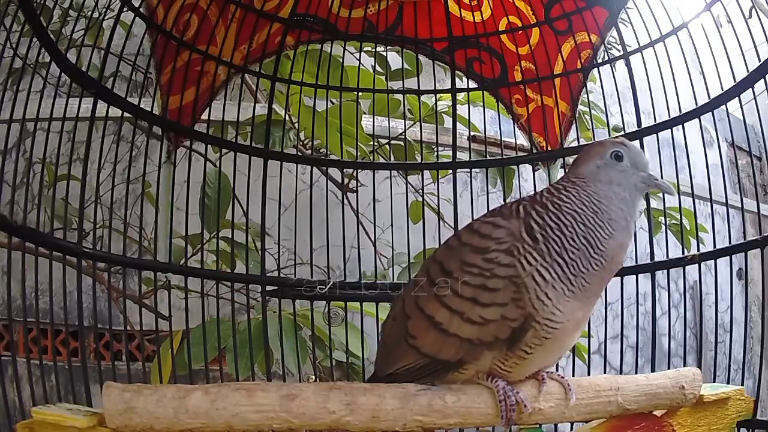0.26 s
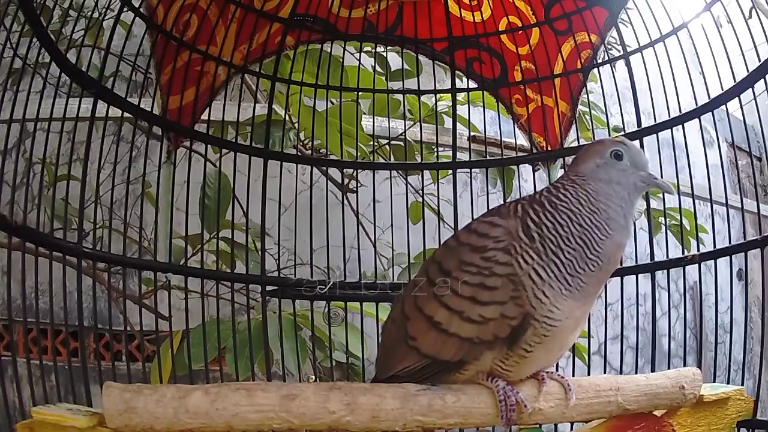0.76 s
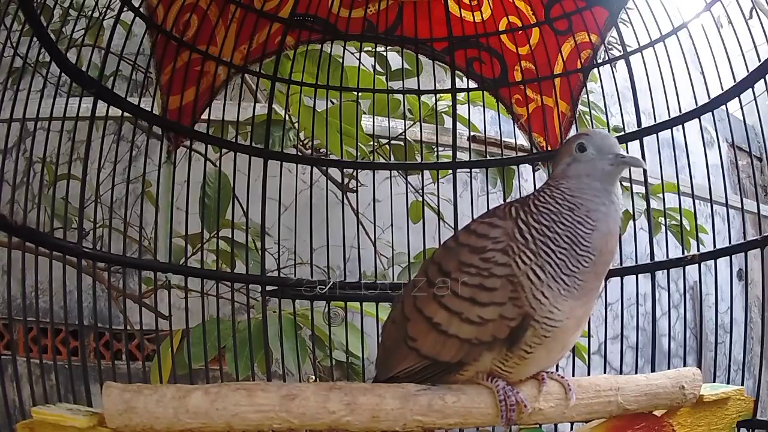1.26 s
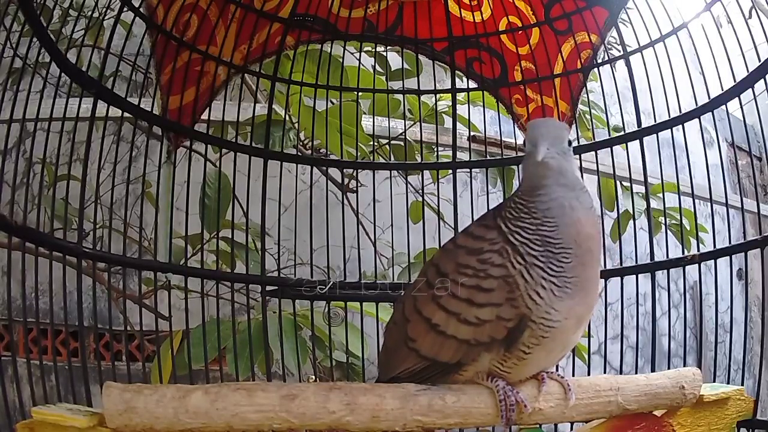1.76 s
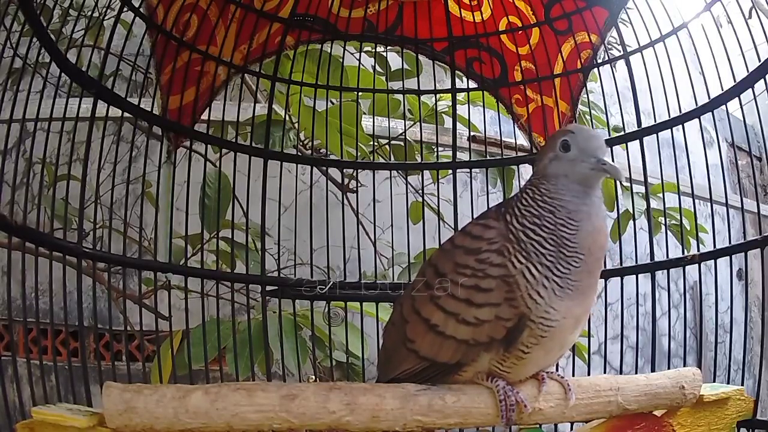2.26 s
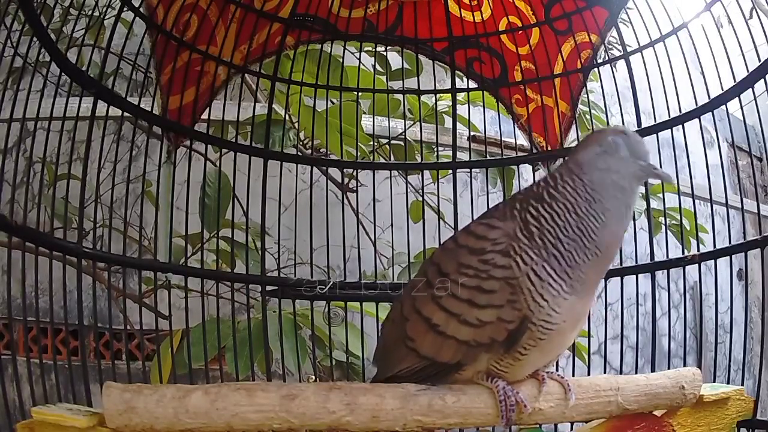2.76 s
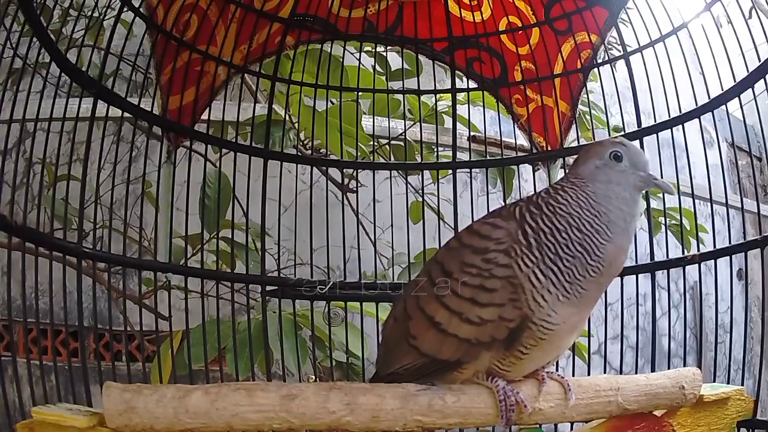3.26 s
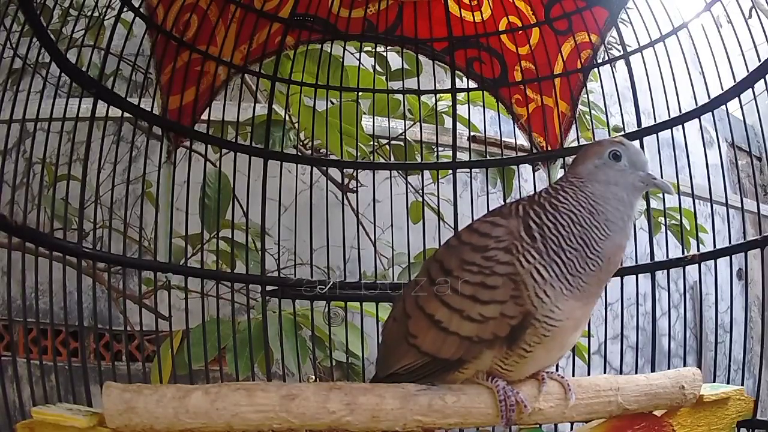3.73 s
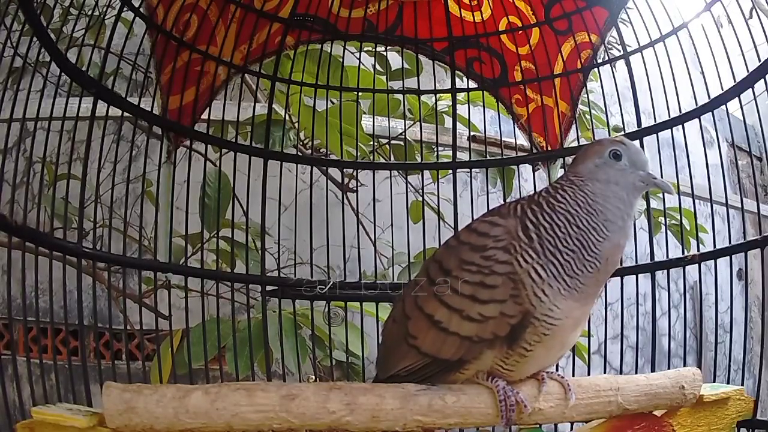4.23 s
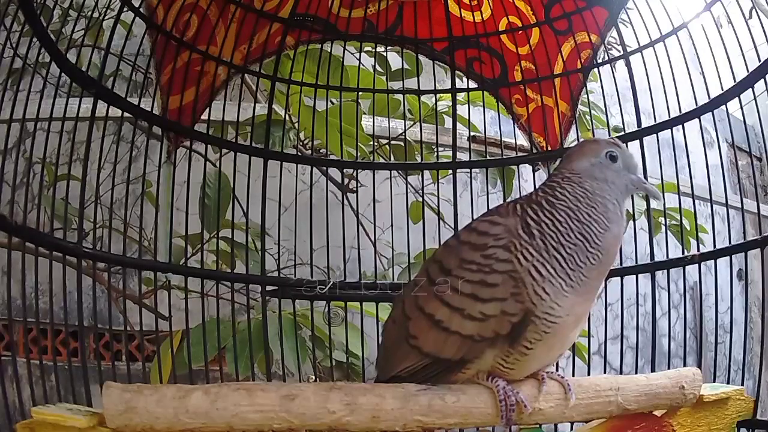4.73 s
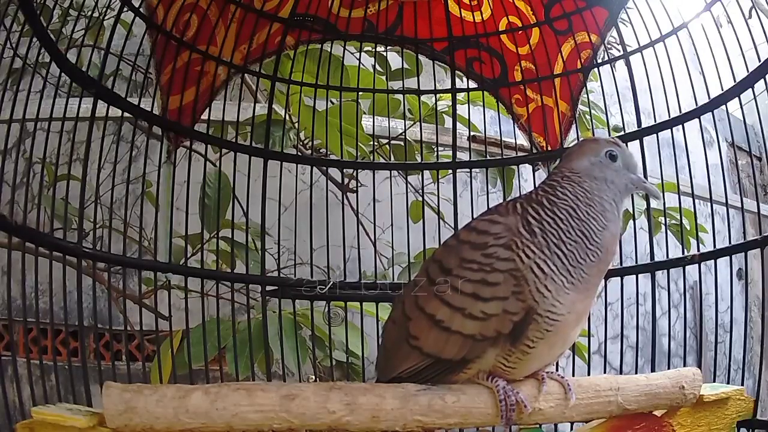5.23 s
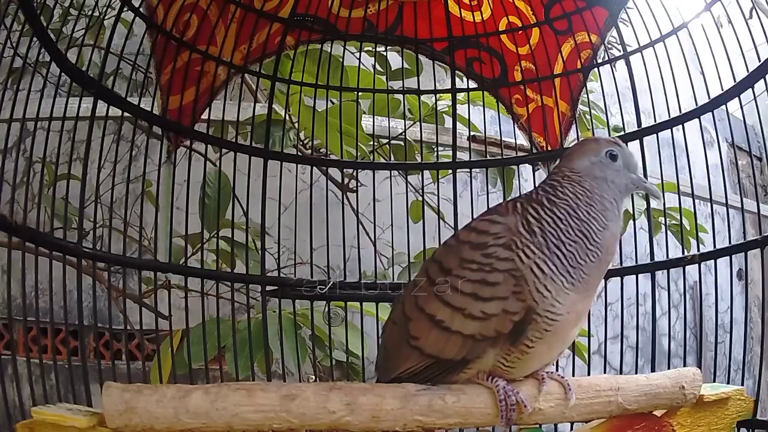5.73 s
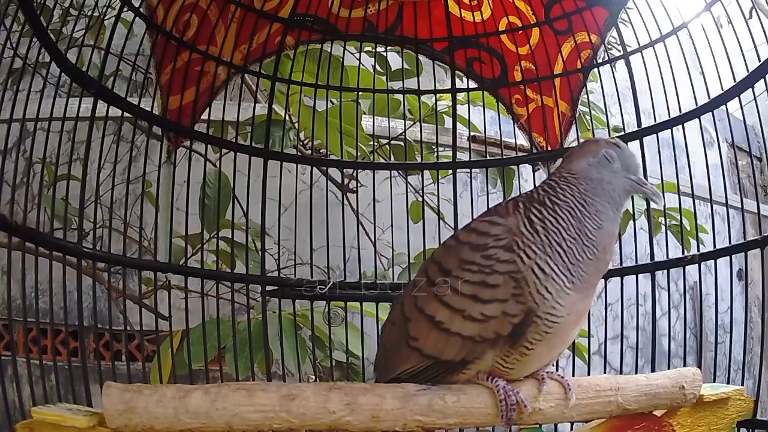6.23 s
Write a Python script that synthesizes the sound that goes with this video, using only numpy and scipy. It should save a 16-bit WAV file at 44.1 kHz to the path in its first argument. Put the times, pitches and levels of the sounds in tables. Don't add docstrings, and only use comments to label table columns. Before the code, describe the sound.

Low town traffic murmurs under faint answering doves and sparrow chirps; a rolling purr, then a loud near dove coo, then another purr.

```python
import sys
import numpy as np
from scipy import signal
from scipy.io import wavfile
from scipy.ndimage import uniform_filter1d

SR = 44100
rng = np.random.default_rng(int(sys.argv[2]) if len(sys.argv) > 2 else 0)


def persist_wave(psi):
    counts = np.round(np.clip(psi, -1, 1) * 32767).astype(np.int16)
    wavfile.write(sys.argv[1], SR, np.atleast_2d(counts).T)


def ratio(d):
    e = np.asarray(d, float) / 20
    return 10 ** e


N = 286209
LEAD = SR // 10

# (frequency [Hz], density [dB per Hz])
TOWN_SPECTRUM = [(15, -46.5), (28, -26), (50, -11), (81, -9), (119, -4), (170, -9.5), (300, -13.5),
                 (550, -24), (920, -25.5), (1420, -34), (2200, -44.5), (4350, -55), (9000, -57.5),
                 (15000, -67.5)]
# (frequency [Hz], likeness [-1..1])
TOWN_LIKENESS = [(30, 1), (500, .99), (2000, 0.81), (4000, 0.41), (8000, 0.46), (13000, .93)]
# (time [s], level [dB])
HEAVY_TRAFFIC = [
    (0, -0.5),
    (.5, -6.5),
    (1.6, -0.5),
    (2.8, 0.5),
    (3.4, 1),
    (4.2, 8),
    (4.9, -1),
    (6.49, -2.5),
]
# (time [s], strong line [Hz], level [dB])
REVVED_ENGINE = [(0, 113.5, -62.5), (.4, 124.5, -47.5), (.52, 132.5, -39), (1.0, 120.8, -45),
                 (2.3, 112.9, -40.5), (2.7, 114.4, -48.5), (3.15, 122, -51), (3.45, 121, -37),
                 (4.6, 118.7, -42), (5.4, 110.1, -41.5), (5.8, 105.7, -42.5), (6.49, 104, -47)]
ENGINE_ORDERS_DB = [-12.5, -5.5, 3.5, -2.5, -6, -18, -11]

# (time [s], peak [dB], pitch scale [ratio])
SPARROW_CALLS = [
    (0.5893, -52, 1),
    (0.762, -66.5, 0.9),
    (1.3633, -53, 0.96),
    (2.2393, -53, 1.0),
    (3.5242, -50, 0.97),
    (3.872, -65, 0.86),
    (4.4629, -47.5, 0.96),
    (5.4024, -50.5, 0.97),
    (6.22, -66, 0.76),
]
# (delay [s], length [s], from [Hz], to [Hz], level [dB])
CHIRP_STEPS = [
    (-.014, .030, 6930, 6870, -18),
    (-.012, 0.033, 4320, 5540, -10.5),
    (.002, 0.022, 5940, 5680, -10),
    (.008, .034, 4500, 4550, -4),
    (.008, .038, 5200, 5000, -1.5),
    (0.037, .040, 4245, 3815, -1),
]

# (start [s], end [s], throat [Hz], full level [dB])
PURR_ROLLS = [
    (1.058, 1.483, 1028, -26.5),
    (5.021, 5.432, 976, -28),
]
# (time [s], peak [dB])
PURR_PULSES = [(1.504, -30), (1.579, -24.5), (1.656, -24.5), (1.757, -24.5), (1.851, -26.5), (1.953, -27),
               (2.048, -27.5), (2.112, -31), (2.221, -29.5), (2.286, -36), (5.455, -32.5), (5.499, -30.5),
               (5.562, -26.5), (5.624, -27), (5.709, -26.5), (5.762, -27), (5.873, -27.5), (5.957, -27),
               (6.118, -41.5)]

# (start [s], blurt [s], whistle [s], whistle top [Hz], effort [dB])
NEAR_COO = [
    (2.768, .0192, .092, 1320, -4.5),
    (2.887, .0135, .024, 1310, -4),
    (2.953, .0112, .021, 1270, -4),
    (3.030, .0095, .033, 1335, -4),
    (3.130, .0112, .071, 1368, -3.5),
    (3.308, .0142, .073, 1360, -4),
]
NEIGHBOUR_COO = [
    (-.011, .015, .068, 1309, -17),
    (.095, 0.0092, .033, 1152, -26),
    (.176, .010, 0.034, 1176, -21.5),
    (.268, 0.015, .037, 1192, -22),
    (.386, 0.021, .085, 1270, -24),
    (6.420, .0232, 0.11, 1320, -20.5),
]
DISTANT_COO = [
    (2.612, 0.019, 0.12, 1259, -39),
    (3.830, .013, .15, 1266, -38.5),
    (4.035, 0.025, .02, 1110, -41),
    (4.135, 0.014, 0.044, 1143, -43),
    (4.260, .012, 0.045, 1198, -42.5),
    (5.970, 0.016, .18, 1257, -38.5),
    (6.205, 0.018, .024, 1126, -42),
    (6.280, .020, 0.04, 1100, -49),
]
# (time [s], pitch offset [Hz], level
# offset [dB])
NEAR_QUAVER = [
    (2.796, 30, -4),
    (2.809, -40, -2),
    (2.828, 30, 3),
    (2.845, -65, 1),
    (2.857, 25, 2),
    (2.866, 125, 3),
    (2.874, 90, 0),
    (2.882, 0, 0),
]
WHISTLE_OVERTONES_DB = [0, -39.5, -50, -63.5, -62.5, -66, -61.5, -71, -72, -78.5]
BLURT_MULTIPLES_DB = [0, -31, -40.5, -51.5, -57, -67, -69.5, -73, -74.5, -84.5]

# (delay [s], level [dB])
PURR_ECHOES = [(.018, -3), (.028, -6), (.038, -10), (.046, -6), (.056, -11), (.066, -12)]
# (delay [s], level [dB])
CAGE_ECHOES = [(.007, -22), (.046, -21.5), (0.055, -33), (0.067, -27)]
# (delay [s], level [dB])
NEXT_CAGE_ECHOES = [(.008, -12), (.023, -6), (0.038, -17.5), (.075, -15)]


def rms_one(x):
    return x / np.sqrt(np.mean(x ** 2) + 1e-20)


def ease(x):
    return np.sin(np.pi / 2 * np.clip(x, 0, 1)) ** 2


def in_time(rows, t):
    s, *columns = np.transpose(rows)
    return [np.interp(t, s, c) for c in columns]


def at_hz(points, hz):
    point_hz, value = np.transpose(points)
    return np.interp(np.log(hz), np.log(point_hz), value)


def drift(rate_hz):
    r = np.exp(-80 * np.pi * rate_hz / SR)
    white = rng.standard_normal(N // 40 + 2002)
    slow = signal.lfilter([1], [1, -2 * r, r * r], white)[2000:]
    return np.interp(np.arange(N) / 40, np.arange(len(slow)), rms_one(slow))


def add(out, start_s, sound):
    at = LEAD + round(start_s * SR) + np.arange(len(sound))
    inside = at < len(out)
    out[at[inside]] += sound[inside]


def stack(hz, gains):
    phase = 2 * np.pi * np.cumsum(hz) / SR
    return sum(g * np.sin((k + 1) * phase) for k, g in enumerate(gains))


def pulse(hz, rise_s, fall_s):
    t = np.arange(int(4 * fall_s * SR + rise_s * SR)) / SR
    shape = np.where(t < rise_s, ease(t / rise_s), np.exp(-((t - rise_s) / fall_s) ** 2))
    return shape * np.sin(2 * np.pi * hz * t)


def behind_leaves(x):
    return signal.sosfilt(signal.butter(4, 3000, fs=SR, output="sos"), x)


def yard(x, echoes, tail_db, t60_s, dull_hz, side_db, pan_db, build_s=0.023, top_t60_s=9.0):
    t = np.arange(int(.7 * SR)) / SR
    white = rng.standard_normal((2, len(t))) * ratio(-60 * t / t60_s) * ease(t / build_s)
    tail = signal.lfilter(*signal.butter(2, dull_hz, fs=SR), white) / np.sqrt(np.sum(white[0] ** 2))
    low = signal.sosfilt(signal.butter(4, 1200, fs=SR, output="sos"), tail)
    mid, side = low + (tail - low) * ratio(-60 * t / top_t60_s)
    answer = ratio(tail_db) * (mid + ratio(side_db) * side * [[1], [-1]])
    answer[:, 0] = 1
    for delay_s, level_db in echoes:
        lag = round(delay_s * SR)
        answer[0, lag] += ratio(level_db)
        answer[1, lag + 1] += ratio(level_db)
    wet = signal.fftconvolve(x[None], answer, axes=1)[:, LEAD:LEAD + N]
    return wet * ratio([[pan_db / 2], [-pan_db / 2]])


def town():
    rumble_db, = in_time(HEAVY_TRAFFIC, np.arange(N) / SR)
    edges_hz = 20 * 2 ** np.arange(0, 9.7, .4)
    white = rng.standard_normal((2, 2, N + SR))
    out = 0
    for k, (low_hz, high_hz) in enumerate(zip(edges_hz, edges_hz[1:])):
        band = signal.butter(2, [low_hz, high_hz], "band", fs=SR, output="sos")
        mid, side = signal.sosfilt(band, white[k % 2])[:, SR:]
        hz = np.sqrt(low_hz * high_hz)
        alike = np.clip(at_hz(TOWN_LIKENESS, hz), -1, 1)
        swell_db = rumble_db * (hz < 90)
        gain = ratio(at_hz(TOWN_SPECTRUM, hz) + swell_db + 0.98 * drift(2.9))
        out = out + gain * (np.sqrt(1 + alike) * mid + np.sqrt(1 - alike) * side * [[1], [-1]])
    return ratio(-42) * rms_one(out) * ratio([[.2], [-.2]])


def revved_engine():
    hz, level_db = in_time(REVVED_ENGINE, np.arange(N) / SR)
    gains = [ratio(d + level_db - 4.5 + 3.45 * drift(4.5)) for d in ENGINE_ORDERS_DB]
    return stack(hz / 3 * (1 + 0.013 * drift(4.3)), gains)


def departing_engine():
    start_s, from_hz, to_hz, climb_s, level_db = 4.15, 177, 218, 1.6, -43.5
    since_s = np.maximum(np.arange(N) / SR - start_s, 0)
    hz = to_hz - (to_hz - from_hz) * np.exp(-since_s / climb_s)
    gain = ease(since_s / 0.37) * ratio(level_db + 1.7 * drift(2.7))
    return gain * stack(hz * (1 + 0.0064 * drift(4.4)), [1])


def sparrow():
    out = np.zeros(N + LEAD)
    for start_s, peak_db, scale in SPARROW_CALLS:
        for delay_s, length_s, from_hz, to_hz, level_db in CHIRP_STEPS:
            t = np.arange(int(length_s * SR)) / SR
            flutter = rms_one(uniform_filter1d(rng.standard_normal(3000), size=30))[:len(t)]
            buzz = np.sin(2 * np.pi * 130 * t + rng.uniform(0, 2 * np.pi))
            scatter = 1 + 0.058 * flutter + 0.027 * rng.standard_normal()
            hz = scale * np.linspace(from_hz, to_hz, len(t)) * scatter
            gain = ratio(peak_db - 7.5 + level_db + 8.9 * buzz) * np.hanning(len(t))
            add(out, start_s + delay_s, gain * stack(hz, [1]))
    return out


def purr_pulses():
    fast_per_s, slow_per_s, slowing_s = 135, 40, .16
    upper_from_hz, upper_to_hz, upper_rise_s = 1360, 1792, .25
    rows = []
    for start_s, end_s, throat_hz, full_db in PURR_ROLLS:
        t = np.arange(0, end_s - start_s, 1 / SR)
        rate = slow_per_s + (fast_per_s - slow_per_s) * np.exp(-(t / slowing_s) ** 2)
        age = t[np.flatnonzero(np.diff(np.floor(np.cumsum(rate) / SR)))]
        late, sharp, loud, upper_sharp = rng.standard_normal((50, 4))[:len(age)].T
        hz = throat_hz * (1 + .025 * sharp)
        level_db = full_db - 24 * (1 - ease(age / 0.23)) + 1.2 * loud
        upper_hz = upper_from_hz + (upper_to_hz - upper_from_hz) * np.minimum(age / upper_rise_s, 1)
        upper_hz = upper_hz * (1 + 0.053 * upper_sharp)
        upper_db = full_db - 24.5 - 12 * (1 - ease(age / 0.027)) - 14 * age
        rows += zip(start_s + age + 0.001483 * late, hz, level_db, upper_hz, upper_db)

        s, level_db = np.transpose([p for p in PURR_PULSES if 0 < p[0] - start_s < 2])
        hz = throat_hz - 250 * np.maximum(s - start_s - 0.78, 0)
        gap_s = np.clip(np.diff(s, prepend=end_s), .02, .1)
        rows += zip(s - .003, hz, level_db, upper_to_hz + 0 * s, level_db - 28 - 60 * gap_s)
    return rows


def purr():
    out = np.zeros(N + LEAD)
    for s, hz, level_db, upper_hz, upper_db in purr_pulses():
        add(out, s, ratio(level_db) * pulse(hz, 0.0031, 0.0042))
        add(out, s, ratio(upper_db) * pulse(upper_hz, 0.0034, 0.0032))
        add(out, s, ratio(upper_db + 15.0) * pulse(1.1 * hz, 0.0023, 0.00056))
        add(out, s, ratio(upper_db + 5.0) * pulse(1.38 * hz, 0.003, 0.0074))
    return out


def valve_creak(crop_hz, sharp):
    creak = pulse(crop_hz * (1.03 + .07 * sharp), .0012, .0014)
    n = len(creak)
    puff = ratio(-17) * np.hanning(n) * np.sin(2 * np.pi * 430 * np.arange(n) / SR)
    return creak + puff


def crop_blurt(blurt_s, crop_hz, bright_db, phrase_age_s):
    t = np.arange(int(blurt_s * SR)) / SR
    part = t / blurt_s
    shape = ease(t / min(.0075, .5 * blurt_s)) * ease((blurt_s - t) / .0022)
    strain_db = -27 * (1 - part) ** 1.5 - 14 * min(phrase_age_s, .6)
    gains = [1] + [ratio(d + bright_db + strain_db) for d in BLURT_MULTIPLES_DB[1:]]
    return shape * stack(crop_hz * (.91 + 0.15 * part), gains)


def arched_whistle(start_s, whistle_s, top_hz, bright_db, clipped_db, quavers):
    t = np.arange(int(whistle_s * SR)) / SR
    left_s = whistle_s - t
    bend_hz, bend_db = in_time(NEAR_QUAVER, start_s + t)
    bend_hz, bend_db = bend_hz * quavers, bend_db * quavers
    glide = np.clip(whistle_s / .07, .55, 2.5)
    rise, drop = .19 * np.exp(-t / (.0055 * glide)), .26 * np.exp(-left_s / (.011 * glide))
    hz = top_hz * (1 - rise - drop) + bend_hz
    slack_db = 25 * np.minimum(hz / top_hz - .97, 0)
    tilt_db = (3.5 - 1.8 * clipped_db) * (t / whistle_s - .5)
    shape = ease(t / 0.0017) * ease(left_s / 0.0095) * ratio(bend_db + tilt_db)
    gains = [1]
    for k, d in enumerate(WHISTLE_OVERTONES_DB[1:], 2):
        gains.append(ratio(d + bright_db + .4 * clipped_db + k * slack_db) * shape)
    return shape * stack(uniform_filter1d(hz, size=101, mode="nearest"), gains)


def dove(notes, crop_hz, creak_db, blurt_bright_db, bright_db, under_db):
    out = np.zeros(N + LEAD)
    quiet_from_s = -1
    chance = rng.standard_normal((12, 5, 2))
    for (start_s, blurt_s, whistle_s, top_hz, blurt_db), creaks in zip(notes, chance):
        for k, (late, sharp) in enumerate(creaks):
            at_s = start_s - .0036 * k - .001 + .0003 * late
            if at_s > quiet_from_s and k < blurt_s * 240:
                add(out, at_s, ratio(blurt_db + creak_db - 3.0 * k) * valve_creak(crop_hz, sharp))
        quiet_from_s = start_s + blurt_s + whistle_s + .010

        blurt = crop_blurt(blurt_s, crop_hz, blurt_bright_db, start_s - notes[0][0])
        add(out, start_s, ratio(blurt_db) * blurt)

        clipped_db = .45 * 1000 * max(.033 - whistle_s, 0)
        quavers = start_s > NEAR_QUAVER[0][0] - .05
        break_s = start_s + blurt_s
        whistle = arched_whistle(break_s, whistle_s, top_hz, bright_db, clipped_db, quavers)
        add(out, break_s - .0003, ratio(blurt_db - under_db - clipped_db) * whistle)
    return out


def scene():
    chirps = yard(sparrow(), [], tail_db=4, t60_s=.3, dull_hz=6000, side_db=-2.5, pan_db=-0.1,
                  build_s=0.0048)
    rolled = yard(purr(), PURR_ECHOES, tail_db=5.5, t60_s=.55, dull_hz=1470, side_db=-22.5, pan_db=1.0)
    far = dove(DISTANT_COO, crop_hz=848, creak_db=-2, blurt_bright_db=2.0, bright_db=23.0, under_db=13.5)
    far = yard(behind_leaves(far), NEXT_CAGE_ECHOES, tail_db=5.5, t60_s=0.35, dull_hz=1500,
               side_db=-33.5, pan_db=1.0)
    next_cage = dove(NEIGHBOUR_COO, crop_hz=975, creak_db=-13.5, blurt_bright_db=-8.5, bright_db=5.7,
                     under_db=8.5)
    next_cage = yard(behind_leaves(next_cage), NEXT_CAGE_ECHOES, tail_db=-3.5, t60_s=0.39, dull_hz=1500,
                     side_db=-22, pan_db=1.6)
    near = dove(NEAR_COO, crop_hz=1004.0, creak_db=-8.0, blurt_bright_db=3.2, bright_db=.1, under_db=6.5)
    near = yard(near, CAGE_ECHOES, tail_db=-8.5, t60_s=0.56, dull_hz=1100, side_db=-28.5, pan_db=1.5,
                top_t60_s=0.34)
    return town() + revved_engine() + departing_engine() + chirps + rolled + far + next_cage + near


def roll_off(x):
    return signal.sosfilt(signal.butter(12, 14980, fs=SR, output="sos"), x)


def record(dry):
    whine_hz, whine_db = 12349, -100
    whine = ratio(whine_db) * np.sin(2 * np.pi * whine_hz * np.arange(N) / SR)
    return roll_off(dry + whine)


dry = scene()
out = record(dry)
persist_wave(out)
```